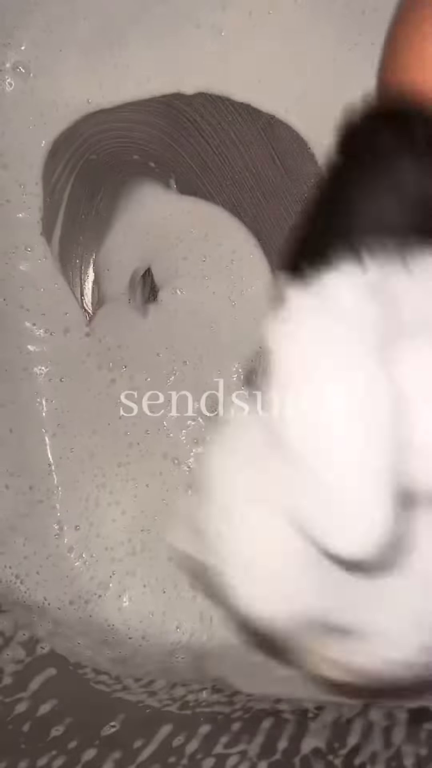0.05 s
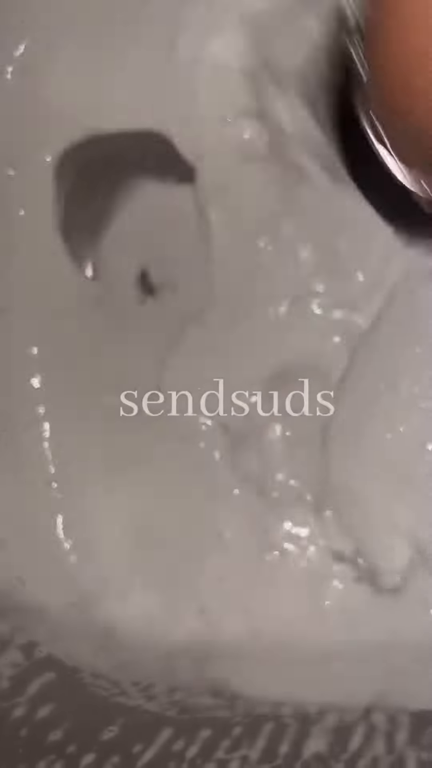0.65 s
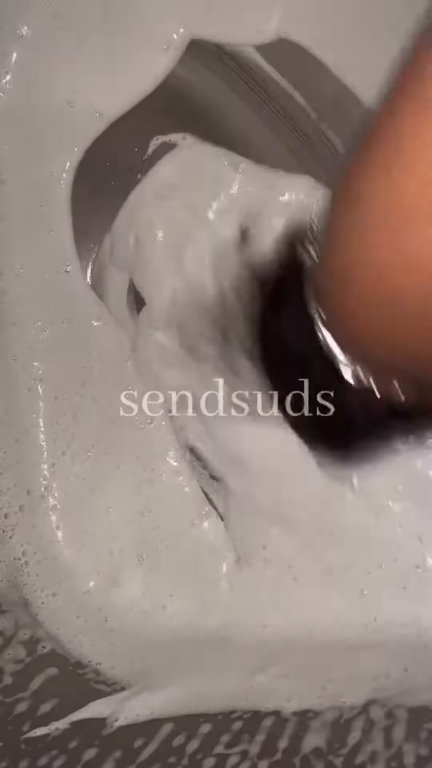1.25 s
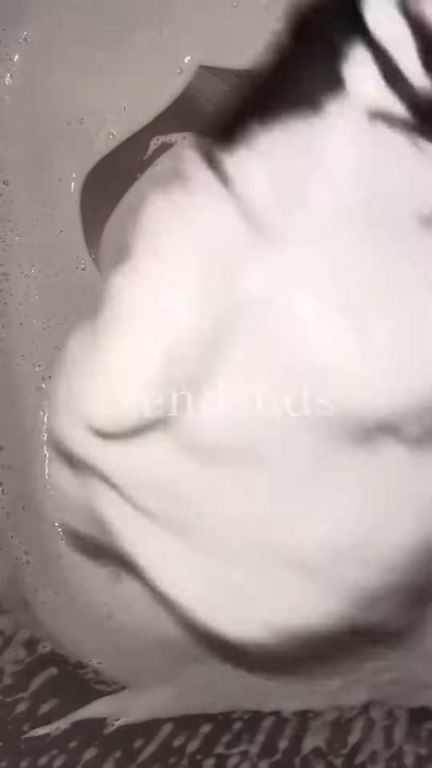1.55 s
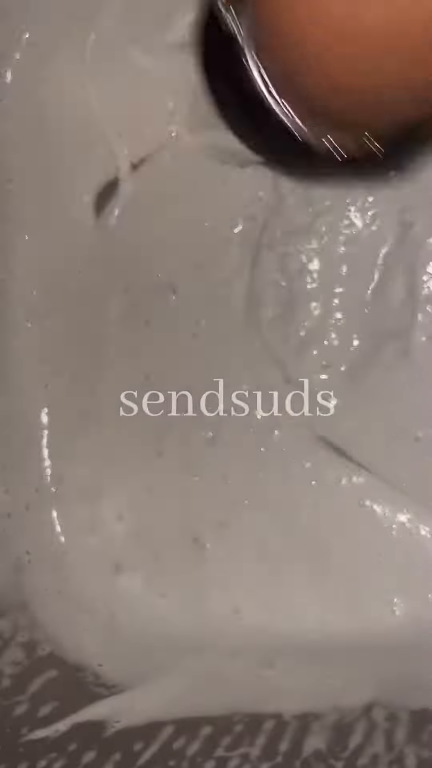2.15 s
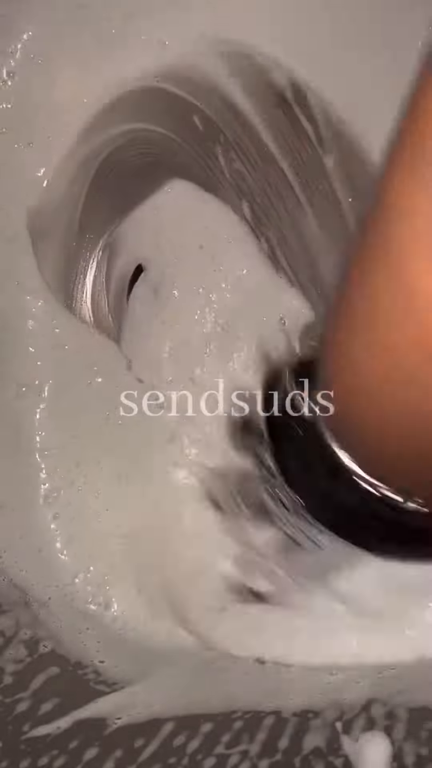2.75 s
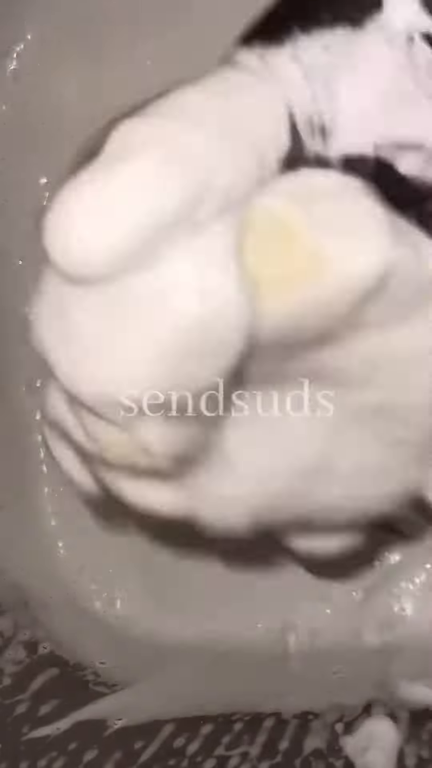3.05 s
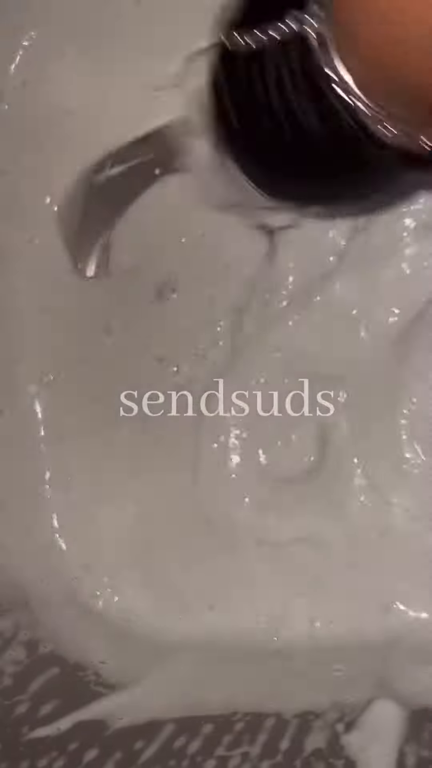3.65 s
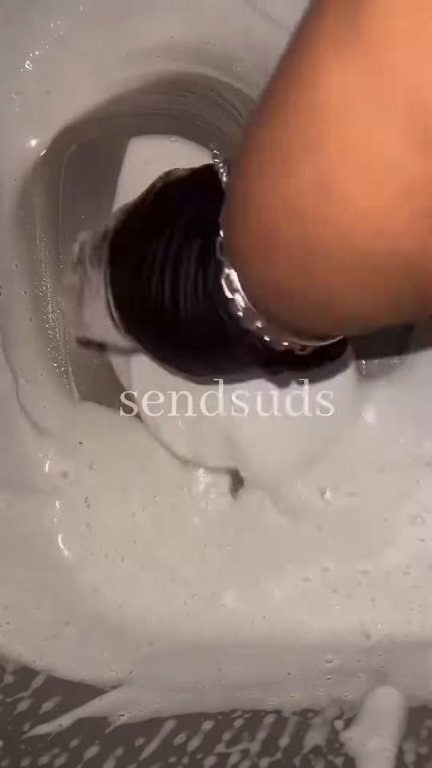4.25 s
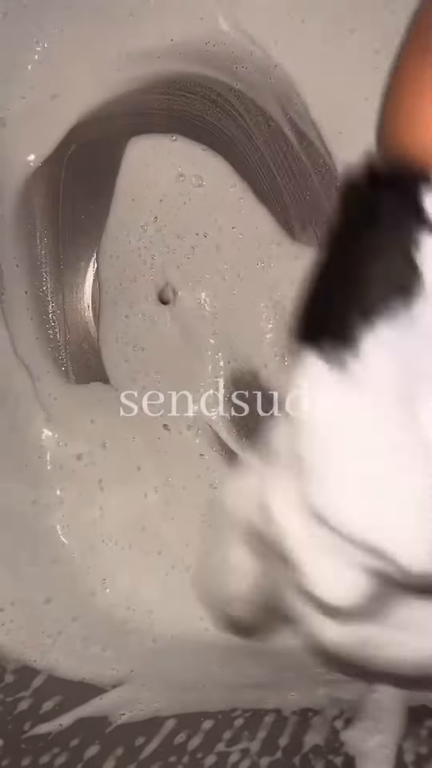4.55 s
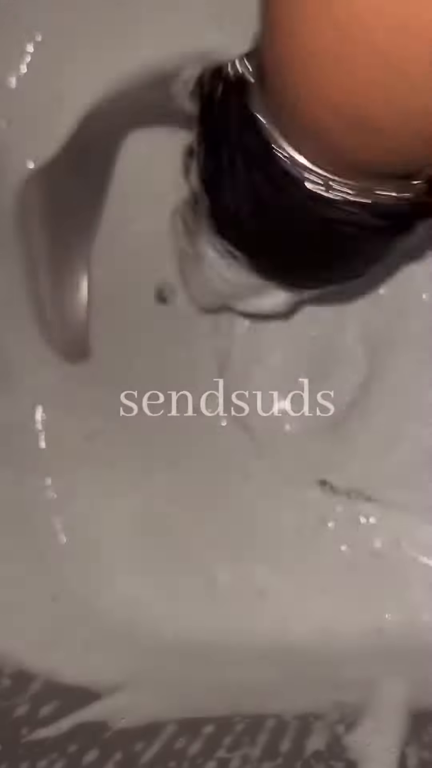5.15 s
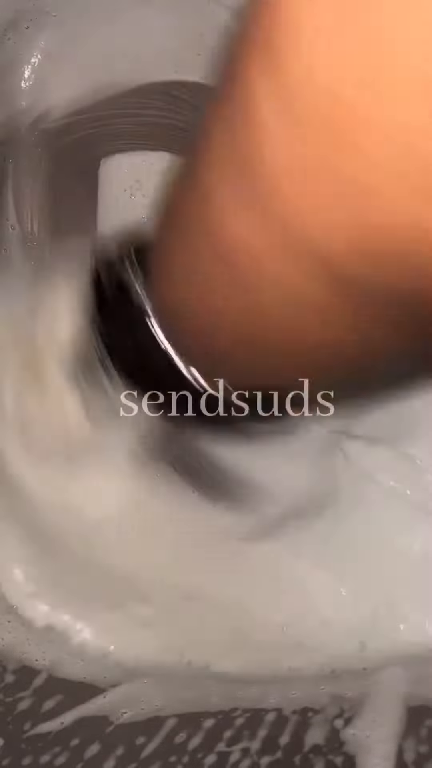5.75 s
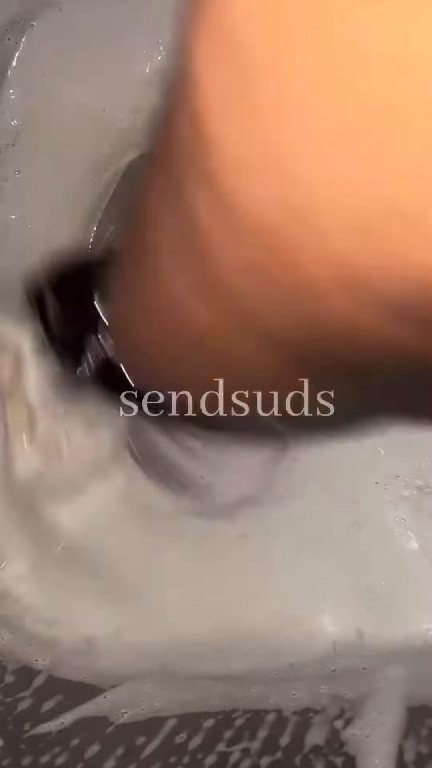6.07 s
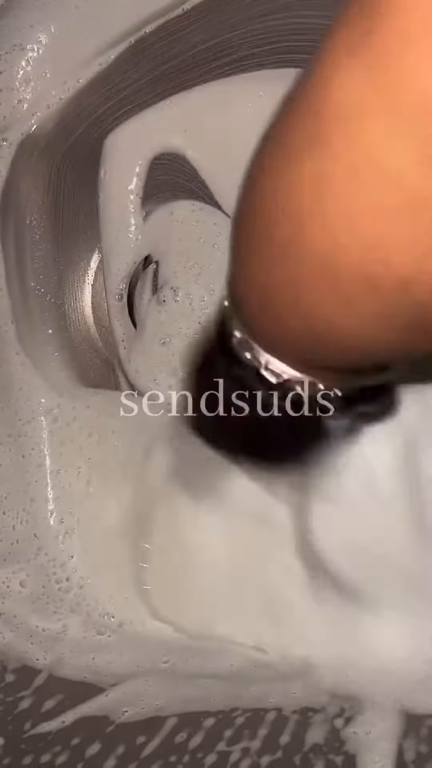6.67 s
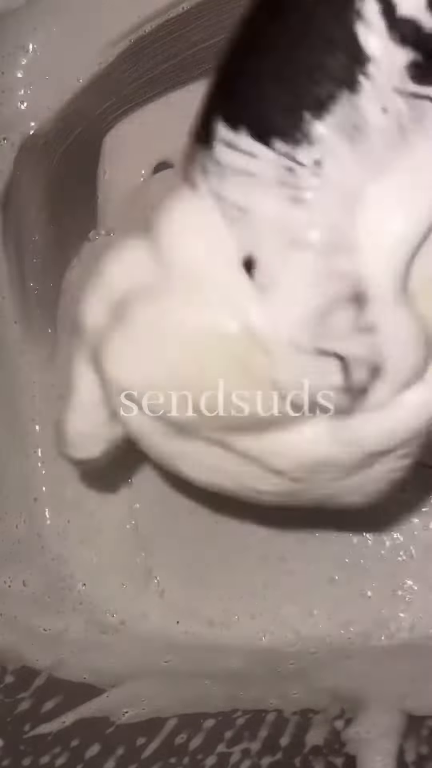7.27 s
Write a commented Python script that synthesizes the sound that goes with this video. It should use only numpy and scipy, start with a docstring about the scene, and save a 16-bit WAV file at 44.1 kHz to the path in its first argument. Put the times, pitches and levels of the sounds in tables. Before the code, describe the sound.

Thick suds squish and crackle as a hand wrings a sponge over a sink, then smears it around the basin in soft, lumpy strokes. The cycle repeats about every second and a half, marked by a sharp wet splat, hollow glugs and little bubble snaps. The loudest pops come early, and gentler swishing ends it. The sound is close, in a small, quiet room.

```python
"""At a steel sink in a small room, a gloved hand works a sponge through thick soap paste, heard close by.
Over and over it lifts the sponge (suction, a fizz), wrings it (compression, a swelling crackle) and
wipes it round the basin (shear, a lumpy drag). Clumps of bubbles rupture in squelches, trapped air
pockets glug as damped oscillators, and wet films snap. The resonances of the basin and the
reverberation of the room colour the sound."""
import sys
import numpy as np
from scipy import signal
from scipy.fft import rfft, irfft, next_fast_len
from scipy.io import wavfile
from scipy.ndimage import uniform_filter1d, map_coordinates

SR = 44100
rng = np.random.default_rng(int(sys.argv[2]) if len(sys.argv) > 2 else 0)


def bounce(signal):
    """Save signal as a 16-bit WAV file at the path given by the first command-line argument."""
    frames = np.transpose(np.atleast_2d(signal))
    limited = np.clip(frames, -1, 1)
    pcm = np.round(limited * 32767).astype(np.int16)
    wavfile.write(sys.argv[1], SR, pcm)


N = 326781
TOP_HZ = 15850  # upper band limit

# spectrum of bursting bubbles: frequency_hz, level_db
BURST_SPECTRUM = [(120, -42), (200, 4.5), (473, -2), (722, -6.5), (1140, -5.5), (1370, -5.5), (2470, -7),
                  (4040, -6.5), (5730, -11), (6760, -12), (8740, -21.5), (9930, -32.5), (13100, -29.5),
                  (16000, -35)]
# response of the basin to gurgling pockets: frequency_hz, gain_db
GURGLE_RESPONSE = [(70, -0.5), (130, -6.5), (190, 2.5), (270, -2), (400, -7.5), (700, -12.5), (1500, -13.5)]
# band limits of big bubbles, small bubbles and spray: edge_hz
SIZE_EDGES_HZ = [450, 1400, 4000, 16000]
# bursting clumps, tilt favouring spray over big bubbles:
# peak_s, length_s, level_db, tilt_db, gurgle_db, pocket_hz
SQUELCHES = [(0.645, 0.016, -28.5, 1, -30, 174), (0.768, 0.0054, -40.5, -7, -57, 297),
             (0.778, 0.0079, -41.5, -2.5, -30.5, 338), (0.87, 0.022, -44, 6, -50, 376),
             (0.906, 0.012, -45, -5, -53, 204), (0.917, 0.0049, -31, -9, -32, 208),
             (0.981, 0.016, -46, -1.5, -54, 220), (1.042, 0.012, -46.5, -1.5, -44.5, 323),
             (1.08, 0.015, -41, -2, -43.5, 348), (1.194, 0.009, -45.5, -5.5, -52, 222),
             (1.234, 0.0074, -49.5, -0.5, -62, 251), (1.317, 0.02, -49.5, -9.5, -37.5, 303),
             (1.331, 0.014, -40.5, -0.5, -36, 290), (1.405, 0.02, -56.5, 6, -53, 170),
             (1.474, 0.0068, -42, -0.5, -50, 247), (1.606, 0.007, -55, -11, -46, 187),
             (2.028, 0.014, -43.5, 1, -44, 155), (2.134, 0.018, -35, 2.5, -40, 254),
             (2.253, 0.006, -49, -1, -65, 289), (2.321, 0.012, -46.5, -1, -45.5, 313),
             (2.431, 0.018, -47, -7, -45.5, 220), (2.497, 0.0055, -34, 4.5, -47, 240),
             (2.711, 0.021, -51, -1.5, -46.5, 279), (2.794, 0.0083, -46.5, -5.5, -48, 235),
             (2.828, 0.011, -52.5, -14, -38.5, 236), (3.009, 0.019, -48, 0, -51, 200),
             (3.581, 0.021, -46.5, 1.5, -59, 197), (3.641, 0.022, -29.5, 0.5, -33, 171.6),
             (3.74, 0.017, -53, 1.5, -56, 284), (3.831, 0.032, -48, -2.5, -46, 202),
             (3.953, 0.01, -54, -5.5, -50, 242), (3.986, 0.018, -41.5, 1.5, -51, 238),
             (4.09, 0.028, -50.5, -1.5, -59, 252), (4.413, 0.0086, -56.5, -11.5, -40.5, 270),
             (4.467, 0.015, -52.5, -3, -41.5, 220), (4.552, 0.013, -52, -4.5, -52.5, 234),
             (5.191, 0.012, -28.5, 0, -34, 228), (5.241, 0.011, -50, -2, -42, 174),
             (5.317, 0.016, -47.5, -3.5, -73, 250), (5.375, 0.036, -56.5, 4, -55, 295),
             (5.527, 0.019, -43, 3.5, -48, 151), (5.798, 0.015, -49, -4.5, -44, 280),
             (5.85, 0.01, -43, -4, -43.5, 240), (5.928, 0.013, -54.5, -1, -48, 162),
             (5.987, 0.0088, -53, 4.5, -47.5, 384), (6.126, 0.019, -51.5, -5.5, -53.5, 205),
             (6.47, 0.054, -59.5, 3, -60, 261), (6.744, 0.016, -54.5, -9, -66, 193),
             (6.805, 0.012, -54, -7, -55, 218), (6.964, 0.011, -53, -11, -47.5, 264),
             (7.017, 0.014, -50, -4, -54, 215), (7.39, 0.015, -55, 5, -55, 256)]

def squelches(rows):
    """Impulse excitation: bubbles of three sizes burst in a resonant cavity, then air gurgles through."""
    out, t = np.zeros(N), np.arange(-SR // 14, SR // 10) / SR
    textures = [coloured(pops(rate=7000, spread_db=2.5),
                         lambda hz: in_basin(BURST_SPECTRUM, hz) * band(hz, lo, hi))
                for lo, hi in zip(SIZE_EDGES_HZ, SIZE_EDGES_HZ[1:])]
    for s, length, db, tilt_db, gurgle_db, pocket_hz in rows:
        start = rng.integers(N - len(t))
        rise, fall = 0.37 * length, 0.63 * length
        cavity_hz = 712 * np.exp(0.11 * rng.standard_normal())  # the hollow under the sponge
        for texture, size_db in zip(textures, [-2.5 - tilt_db, -0.5, -4.5 + tilt_db]):
            burst = texture[start:][:len(t)]
            upper_hz = cavity_hz * rng.uniform(2.73, 4.15)  # inharmonic higher mode
            burst = burst + 0.45 * resonate(burst, cavity_hz, q=6.3) + 0.27 * resonate(burst, upper_hz, q=74)
            add(out, s + t[0], amp(db + size_db) * shaped(burst, swell(t, rise, fall)))
        # small pockets open one after another, just behind the burst
        gurgle = np.zeros(len(t))
        for birth in np.linspace(t[0], t[-1], num=36):
            age = t - birth - 0.001885 * rng.normal()
            pitch_hz = pocket_hz * np.exp(0.636 * rng.uniform(-1.09, 1))
            gurgle += damped_tone(age, pitch_hz, t60=0.051, glide=0.32, attack=0.0018)
        gurgle = coloured(gurgle, lambda hz: in_basin(GURGLE_RESPONSE, hz))
        add(out, s + t[0] + 0.00471, amp(gurgle_db + 2) * shaped(gurgle, swell(t, rise, 1.27 * fall)))
    return out

# large air pockets popping open: start_s, level_db, pitch_hz
GLUGS = [(0.647, -14.5, 294), (0.649, -21.5, 149), (0.7778, -8.5, 270), (0.782, -22.5, 150),
         (0.92, -20, 153), (1.035, -25.5, 329), (1.201, -29.5, 268), (1.325, -21, 118), (1.601, -29.5, 225),
         (2.134, -25.5, 128), (2.164, -27.5, 277), (2.324, -28.5, 292), (2.498, -29, 214),
         (2.614, -39, 163), (2.829, -17.5, 273), (3.65, -30, 100), (3.831, -23, 267), (4.072, -32, 325),
         (4.415, -25.5, 283), (4.462, -26.5, 234), (4.483, -26.5, 262), (5.195, -18, 273),
         (5.2, -30.5, 113), (6.35, -40.5, 230), (6.747, -27.5, 230), (6.804, -30, 271), (6.834, -40, 108),
         (6.867, -35.5, 272), (6.96, -32, 273)]

def glugs():
    """Bubble resonance: a big pocket opens with a quickly dropping note and thumps the sink's bottom."""
    out, t = np.zeros(N), np.arange(SR // 5) / SR
    for s, db, hz in GLUGS:
        t60 = 0.036 * (270 / hz)  # smaller pockets die sooner
        note = damped_tone(t, hz, t60, glide=0.015, attack=0.0032, pinch=0.97)
        overtone = amp(-23) * damped_tone(t, 1.88 * hz, 0.68 * t60, glide=0.037)
        thump = amp(-24) * damped_tone(t, 120, t60=0.09, glide=0, attack=0.004)
        add(out, s, amp(db + 1.4) * (note + overtone + thump))
    return out

# treble of a snap relative to a burst: frequency_hz, gain_db
SNAP_TILT = [(1800, 9), (7000, 6), (12000, 1.5)]
# wet films tearing: start_s, level_db, ring_hz, body_db
SNAPS = [(0.364, -37, 2500, 7), (0.499, -31.5, 2170, 5.5), (0.602, -35, 1510, 3), (0.641, -13.5, 3720, -1),
         (0.6496, -14, 3040, 15.5), (0.914, -15, 1500, 0.5), (0.9178, -14.5, 970, 6),
         (1.074, -30, 2440, -15), (1.6, -35.5, 755, 17), (1.86, -33.5, 2350, 8), (2.015, -30, 1100, 13),
         (2.316, -31.5, 3440, 8), (2.4949, -24, 2170, -5), (2.829, -29.5, 2610, 9),
         (3.082, -42.5, 5830, -18), (3.1332, -38, 1880, 0), (3.323, -40, 2960, -12), (3.611, -36, 1490, 12),
         (3.946, -36.5, 1000, 13), (4.4458, -38, 1900, 11), (5.187, -20, 3040, 5.5),
         (5.242, -41, 3800, -13), (5.85, -30, 2550, -3), (5.9857, -34.5, 2480, -7), (6.745, -38, 1190, 3),
         (6.957, -41, 800, 11), (7.008, -35, 2300, 8), (7.0197, -31.5, 2900, 2)]

def snaps():
    """Impulse and scattering: a film tears and rings briefly, and the basin's walls scatter the click."""
    out, t = np.zeros(N), np.arange(SR // 20) / SR
    for s, db, ring_hz, body_db in SNAPS:
        scatter = 0.37 * rng.standard_normal(len(t)) * amp(-60 * t / 0.018)
        tilt = [(700, body_db)] + SNAP_TILT
        click = coloured(scatter + (t == 0), lambda hz: in_basin(BURST_SPECTRUM, hz) * amp(along(tilt, hz)))
        click = click + 1.16 * resonate(click, ring_hz, q=7.1)
        add(out, s, amp(db - 1) * click / np.abs(click).max())
    return out

# the sponge peels off the paste and draws in air: peak_s, rise_s, fall_s, foam_db, fizz_db
LIFTS = [(0.088, 0.052, 0.047, -54.5, -52.5), (1.535, 0.072, 0.095, -53.5, -54.5),
         (2.975, 0.09, 0.065, -55.5, -54.5), (4.605, 0.06, 0.06, -55, -53), (7.07, 0.06, 0.22, -56.5, -56)]
# the fist closes on the sponge: start_s, end_s, final_foam_db, swell_db, fizz_over_foam_db
WRINGS = [(0.287, 0.556, -51.5, 5, -7.5), (1.663, 2.046, -47, 16, -8), (3.328, 3.6, -54, 3, -3),
          (4.81, 5.15, -50, 19, -13)]
# the sponge is pushed round the basin: start_s, end_s, foam_db, fade_db, drag_db, fizz_db
WIPES = [(0.0, 0.19, -52, 5.5, -55.5, -60), (0.683, 0.792, -55, 3, -45, -58.5),
         (0.944, 1.42, -55.5, 5.5, -53, -60.5), (1.49, 1.619, -68, 3, -56, -61),
         (2.17, 2.517, -54, 1.5, -50.5, -58), (2.557, 2.834, -60, -1, -56, -64),
         (2.956, 3.018, -58, 2, -54, -64), (3.68, 3.9, -55, 6.5, -52.5, -59),
         (4.044, 4.303, -59.5, 2.5, -56, -62.5), (4.354, 4.394, -59.5, -2.5, -55, -62),
         (4.468, 4.663, -59.5, -1.5, -57, -74), (5.22, 5.5, -55, 2, -55, -60.5),
         (5.615, 5.971, -58.5, 1, -54.5, -63.5), (6.11, 6.55, -71, 11, -61, -63),
         (6.702, 6.994, -63, 6, -51.5, -84)]
WIPE_ATTACK_S, WIPE_RELEASE_S = 0.026, 0.027

def hand_levels():
    """Incoherent addition: the powers of all strokes sum to the drag, foam and fizz levels in dB."""
    # foam left to itself keeps settling
    drag, foam, fizz = [np.full(N, amp(rest_db) ** 2) for rest_db in (-65.5, -65.5, -69)]
    for s, rise, fall, foam_db, fizz_db in LIFTS:
        t = np.arange(N) / SR - s
        pull = np.exp(-np.abs(t / np.where(t < 0, rise, fall)) ** 2.4)  # a slightly flat-topped bell
        foam += (amp(foam_db) * pull) ** 2
        fizz += (amp(fizz_db) * pull) ** 2
    for start, end, db, swell_db, fizz_over_foam_db in WRINGS:
        squeeze = amp(db - swell_db) * stroke(start, end, attack=0.02, release=0.04, change_db=swell_db)
        drag += (amp(-5) * squeeze) ** 2
        foam += squeeze ** 2
        fizz += (amp(fizz_over_foam_db) * squeeze) ** 2
    for start, end, foam_db, fade_db, drag_db, fizz_db in WIPES:
        push = stroke(start, end, WIPE_ATTACK_S, WIPE_RELEASE_S, -fade_db)
        drag += (amp(drag_db) * push) ** 2
        foam += (amp(foam_db) * push) ** 2
        fizz += (amp(fizz_db) * push) ** 2
    return 10 * np.log10([drag, foam, fizz])

# spectra of dragging paste, crackling foam and airy fizz: frequency_hz, level_db
DRAG_SPECTRUM = [(30, -14), (70, -14), (130, 0.5), (190, 6), (270, 4.5), (400, -5.5), (600, -11.5),
                 (1200, -41)]
FOAM_SPECTRUM = [(120, -42.5), (200, 10), (232, 23), (334, -23), (500, -8), (579, -13), (735, -16),
                 (836, -12.5), (1680, -9.5), (2050, -10), (3760, -12), (6400, -14.5), (10100, -35.5),
                 (16000, -43)]
FIZZ_SPECTRUM = [(120, -33), (200, -3), (263, -5), (538, -19), (590, -7), (749, -5), (883, -27), (1210, -6),
                 (1560, 8), (3310, -5.5), (6760, -15), (9750, -29), (11900, -29), (16000, -29)]

def smear():
    """Shear: sliding breaks the foam into a fine crackle, while the paste drags in soft lumps."""
    drag_db, foam_db, fizz_db = hand_levels()
    grip = wobble(70)  # the sponge catches and slips
    drag = crackle(900, 2, lambda hz: in_basin(DRAG_SPECTRUM, hz))
    foam = crackle(4000, 2, lambda hz: in_basin(FOAM_SPECTRUM, hz) * band(hz, 530, 3720))
    foam = shifting_cavities(foam, depth_db=3)
    wet = crackle(7000, 1.5, lambda hz: in_basin(FOAM_SPECTRUM, hz) * band(hz, 3200, TOP_HZ))
    airy = crackle(22000, 3.8, lambda hz: in_basin(FIZZ_SPECTRUM, hz) * band(hz, 4700, TOP_HZ))
    sizzle = crackle(37000, -3, lambda hz: band(hz, 10500, TOP_HZ))
    # as the sponge draws air back in, the fizz takes over and turns finer
    air = np.clip((fizz_db - foam_db + 5.5) / 6, 0, 1)
    fizz = np.sqrt(air) * airy + np.sqrt(1 - air) * wet + amp(-25) * air ** 2 * sizzle
    fizz = shifting_cavities(fizz, depth_db=2.5)
    return (amp(drag_db - 3 + 1.6 * wobble(35)) * drag
            + amp(foam_db - 0.96 + 0.91 * grip) * foam
            + amp(fizz_db - 2.26 + 1.94 * grip) * fizz)

def shifting_cavities(x, depth_db):
    """Time-varying filtering: cavities in the foam open and close, so spectral peaks come and go."""
    spectra = signal.stft(x, nperseg=512)[2]
    field = uniform_filter1d(rng.standard_normal(spectra.shape), size=3, axis=0)
    field = uniform_filter1d(field, size=9, axis=1)
    return unit(signal.istft(spectra * amp(depth_db * unit(field)), nperseg=512)[1][:N])

# air drawn through narrow gaps in the paste: peak_s, half_width_s, pitch_hz, level_db
CHANNELS = [(0.648, 0.013, 756, -34), (0.869, 0.018, 670, -41), (1.329, 0.026, 655, -41.5),
            (1.339, 0.01, 4870, -47.5), (2.051, 0.041, 1130, -49.5), (3.643, 0.018, 747, -33),
            (5.107, 0.011, 4300, -55), (5.32, 0.011, 1970, -48), (6.711, 0.053, 1780, -64),
            (6.869, 0.077, 1700, -66)]

def channels():
    """Cavity resonance: air sucked through a gap in the paste crackles at the gap's own pitch."""
    out, t = np.zeros(N), np.arange(-SR // 8, SR // 8) / SR
    impulses = pops(rate=2500, spread_db=3.5)
    for s, half_width, hz, db in CHANNELS:
        flow = impulses[rng.integers(N - len(t)):][:len(t)]
        hollow = resonate(resonate(flow, hz, q=7.2), hz, q=7.2)
        add(out, s + t[0], amp(db) * shaped(hollow, np.exp(-2 * (t / half_width) ** 2)))
    return out

# wrung-out paste landing in the basin: start_s, level_db
LANDINGS = [(0.645, -34), (2.135, -33), (3.644, -32), (5.192, -32)]

def landings():
    """Impact: each falling mass gives the basin one dull, low push."""
    out, t = np.zeros(N), np.arange(SR // 5) / SR
    for s, db in LANDINGS:
        add(out, s, amp(db) * damped_tone(t, hz=79, t60=0.082, glide=0, attack=0.0016))
    return out

def stray_squelch_rows(per_s=3, length_s=0.021, pocket_hz=247, tries=8):
    """A random point process: faint squelches fall along each wipe and follow its level."""
    rows = []
    for start, end, foam_db, fade_db, drag_db, _ in WIPES:
        for progress, chance, faintness in rng.random((tries, 3)):
            if chance * tries < per_s * (end - start):
                peak_s = start + progress * (end - start)
                drop_db = fade_db * progress + 4 * faintness
                rows.append((peak_s, length_s, foam_db - 5 - drop_db, 0, drag_db - 4.5 - drop_db, pocket_hz))
    return rows

def rub():
    """Friction noise: the sponge hisses thinly on the steel during each wipe."""
    contact = sum(stroke(start, end, WIPE_ATTACK_S, WIPE_RELEASE_S, 0) for start, end, *_ in WIPES)
    hiss = crackle(12000, 2.2, lambda hz: band(hz, 10000, TOP_HZ))
    return amp(-86 + 1.5 * wobble(25)) * contact * hiss

# hollow resonances and notches of the basin: centre_hz, width_hz, gain_db
BASIN_MODES = [(134.2, 32.4, 8.5), (190.6, 25, -16.5), (273, 34, -1.5), (436, 340, 1), (494, 9.7, 4),
               (686, 265, 9.5), (1032, 150, 2.5), (1250, 870, 2), (4000, 440, -0.5), (5360, 200, 0)]

def in_basin(spectrum, hz):
    """Source and filter: the gain of a source spectrum, shaped by the basin's resonances."""
    basin_db = sum(db / (1 + (2 * (hz - centre) / width) ** 2) for centre, width, db in BASIN_MODES)
    return amp(along(spectrum, hz) + basin_db)

# reverberation time of the room: frequency_hz, t60_s
ROOM_DECAY = [(150, 0.11), (1000, 0.056), (5000, 0.049), (14000, 0.13)]

def room(x):
    """Reverberation: the diffuse reflections of a small room decay exponentially in each band."""
    hz, t, spectra = signal.stft(rng.standard_normal(SR // 3), SR, nperseg=256)
    decay = amp(-60 * t / along(ROOM_DECAY, hz)[:, None])
    tail = signal.istft(spectra * decay, SR, nperseg=256)[1]
    delayed = np.pad(x, (SR // 200, 0))
    return signal.fftconvolve(delayed, tail / np.linalg.norm(tail))[:N]

# spectrum of the still room: frequency_hz, level_db
ROOM_TONE_SPECTRUM = [(12, -27), (20, -0.5), (81, 0.5), (182, -16), (293, -6), (485, -13.5), (574, -23.5),
                      (718, -19), (2530, -25), (6180, -49), (10200, -51), (14300, -33), (16000, -85)]

def room_tone():
    """Stationary noise: a faint, steady rumble and hiss."""
    return amp(-65) * unit(coloured(rng.standard_normal(N), lambda hz: amp(along(ROOM_TONE_SPECTRUM, hz))))

def pops(rate, spread_db):
    """Shot noise: impulses of random size and sign, as of bubble walls rupturing, about rate a second."""
    size = amp(spread_db * np.minimum(rng.exponential(size=N), 5))
    return unit(size * rng.choice([-1, 1], N) * (rng.random(N) < rate / SR))

def crackle(rate, spread_db, gain):
    """Filtered shot noise: pops coloured by a gain curve, at rms 1."""
    return unit(coloured(pops(rate, spread_db), gain))

def damped_tone(t, hz, t60, glide, attack=0.0012, pinch=0):
    """Damped oscillation: a pinched air pocket starts sharp, then glides as its mouth changes."""
    t = np.maximum(t, 0)
    pitch = hz * (1 + glide * np.minimum(t / t60, 1) + pinch * np.exp(-t / 0.00086))
    phase = 2 * np.pi * np.cumsum(pitch * (t > 0)) / SR
    return np.sin(phase) * amp(-60 * t / t60) * (1 - np.exp(-t / attack))

def stroke(start, end, attack, release, change_db):
    """Amplitude envelope: a hand movement sets in, drifts by change_db and dies away."""
    t = np.arange(N) / SR
    edges = np.exp(-np.maximum(start - t, 0) / attack - np.maximum(t - end, 0) / release)
    return edges * amp(change_db * np.clip((t - start) / (end - start), 0, 1))

def swell(t, rise, fall):
    """Exponential growth and decay: pressure builds, peaks at t = 0 and lets go."""
    return np.exp(.5 - np.hypot(np.where(t < 0, t / rise, t / fall), .5))

def shaped(texture, envelope):
    """Amplitude modulation: a texture under an envelope, with the envelope's own energy."""
    return unit(texture * envelope) * np.sqrt(np.mean(envelope ** 2))

def wobble(rate):
    """Spline interpolation: a smooth random curve with rate knots a second."""
    return map_coordinates(rng.standard_normal(int(N * rate / SR) + 4), [np.arange(N) * rate / SR])

def resonate(x, hz, q):
    """Second-order resonance with unit gain at its centre."""
    return signal.lfilter(*signal.iirpeak(min(hz, TOP_HZ), q, fs=SR), x)

def coloured(x, gain):
    """Minimum-phase filtering: x through the causal filter of magnitude gain(hz)."""
    size = 2 * next_fast_len(len(x) // 2 + 4096)
    magnitude = np.maximum(gain(np.fft.rfftfreq(size, 1 / SR)), 1e-6)
    cepstrum = irfft(np.log(magnitude), size)
    cepstrum[1:size // 2] *= 2
    cepstrum[size // 2 + 1:] = 0
    return irfft(rfft(x, size) * np.exp(rfft(cepstrum)), size)[:len(x)]

def band(hz, lo, hi):
    """Band-pass gain with soft edges."""
    return ((1 + (lo / (hz + 1)) ** 6) * (1 + (hz / hi) ** 6)) ** -.5

def along(points, hz):
    """Interpolation of (frequency_hz, value) points on a logarithmic frequency axis."""
    frequencies, values = np.transpose(points)
    return np.interp(np.log(hz + 1), np.log(frequencies), values)

def amp(db):
    """Decibels to amplitude ratio."""
    return 10 ** (np.asarray(db) / 20)

def unit(x):
    """Normalisation to rms 1."""
    return x / np.sqrt(np.mean(x ** 2) + 1e-20)

def add(track, s, sound):
    """Superposition of a sound on the track from time s."""
    start = round(s * SR)
    part = sound[max(-start, 0):max(N - start, 0)]
    track[max(start, 0):][:len(part)] += part

def scene():
    """Superposition: the sponge's direct sound, its reverberation and the room tone."""
    sponge = smear() + rub() + snaps() + channels() + glugs() + landings()
    sponge += squelches(SQUELCHES + stray_squelch_rows())
    # the sponge's sounds carry little below about 55 Hz
    sponge = signal.sosfilt(signal.butter(2, 55, "highpass", fs=SR, output="sos"), sponge)
    return (sponge + amp(-11.5) * room(sponge) + room_tone())[None]

def record(dry):
    """Band limiting: an ideal low-pass filter keeps nothing above TOP_HZ."""
    size = next_fast_len(N + SR // 2)
    passband = np.fft.rfftfreq(size, 1 / SR) < TOP_HZ
    return irfft(rfft(dry, size) * passband, size)[:, :N]

dry = scene()
out = record(dry)
bounce(out)
```